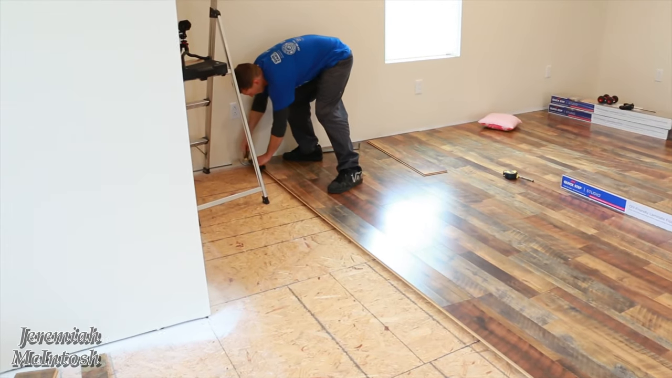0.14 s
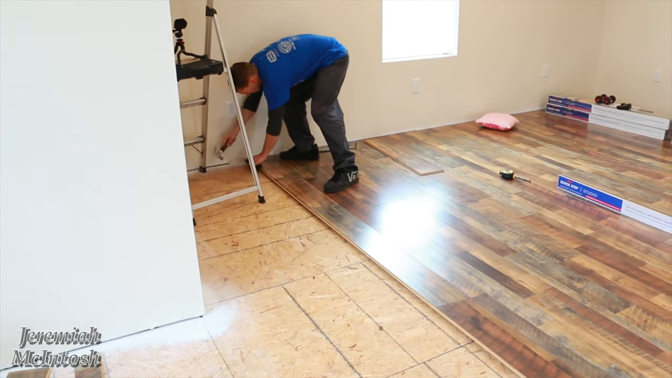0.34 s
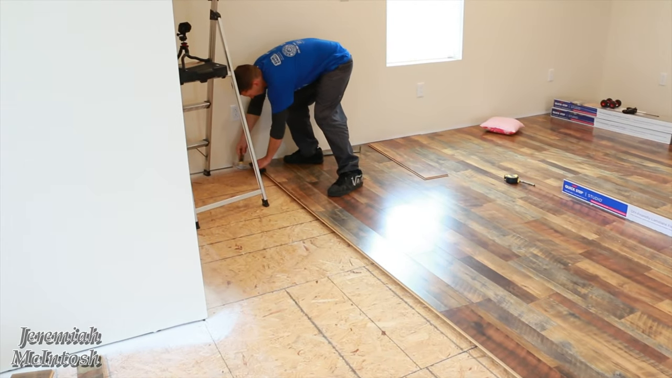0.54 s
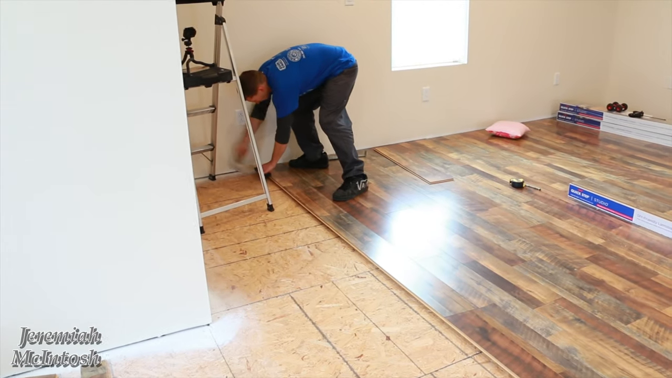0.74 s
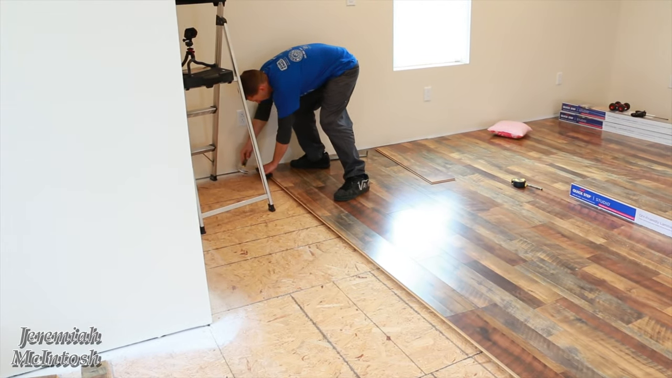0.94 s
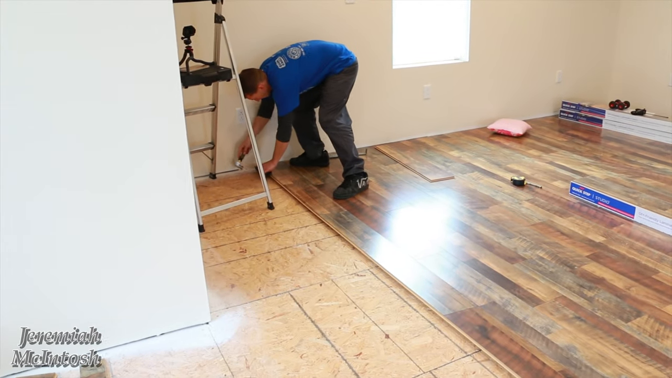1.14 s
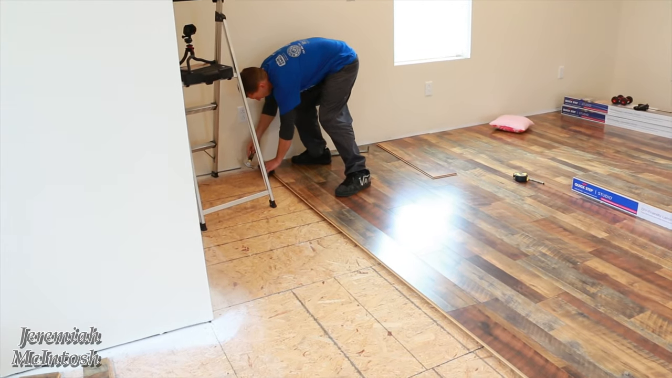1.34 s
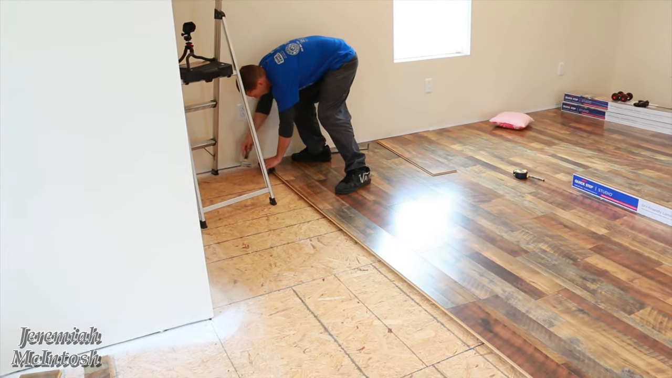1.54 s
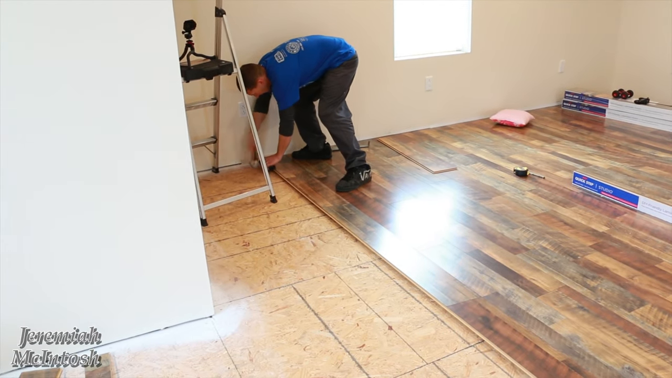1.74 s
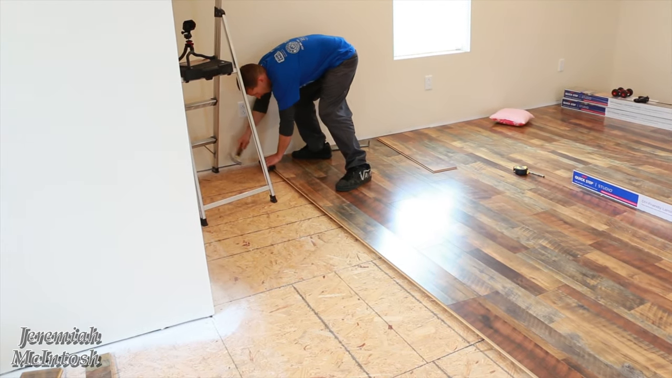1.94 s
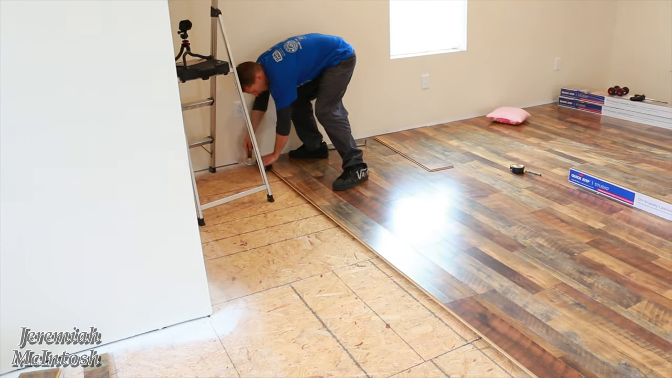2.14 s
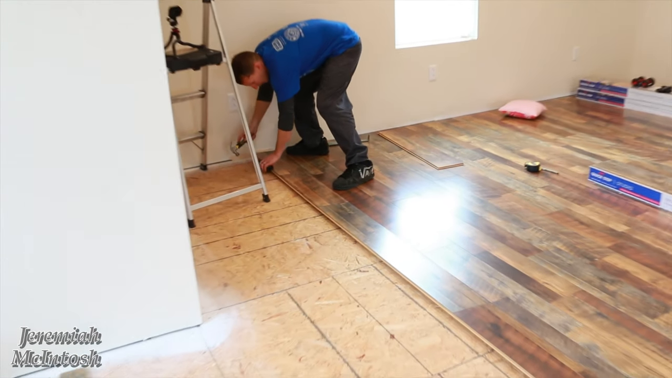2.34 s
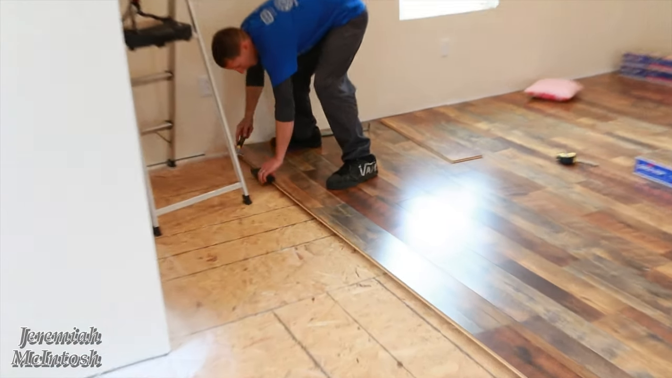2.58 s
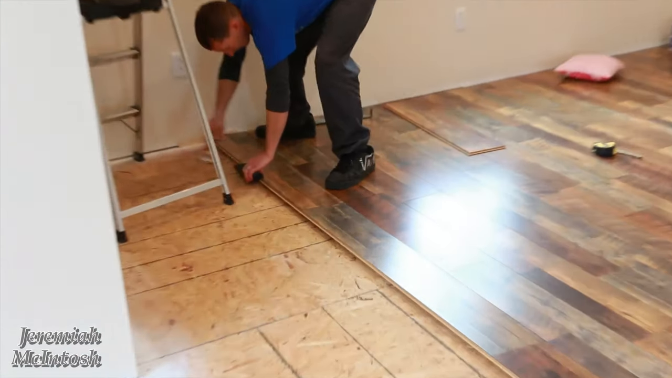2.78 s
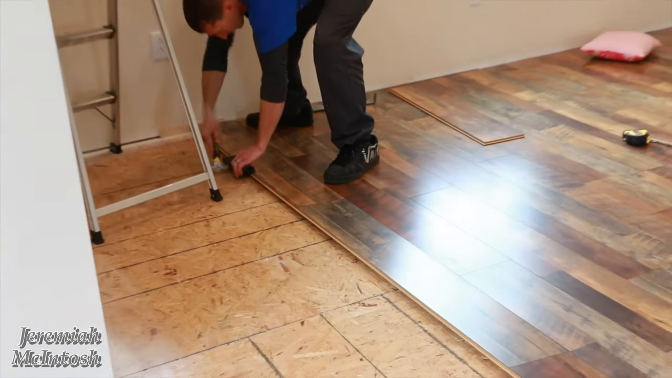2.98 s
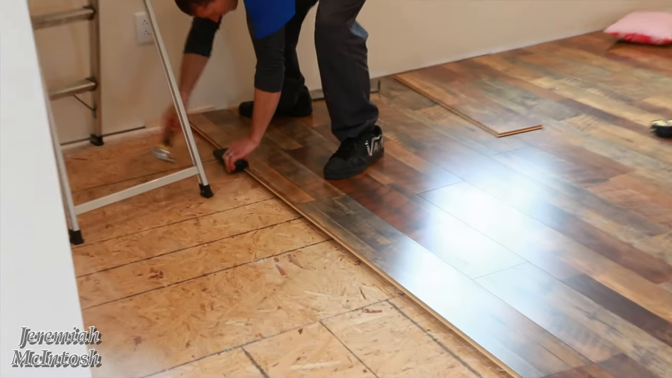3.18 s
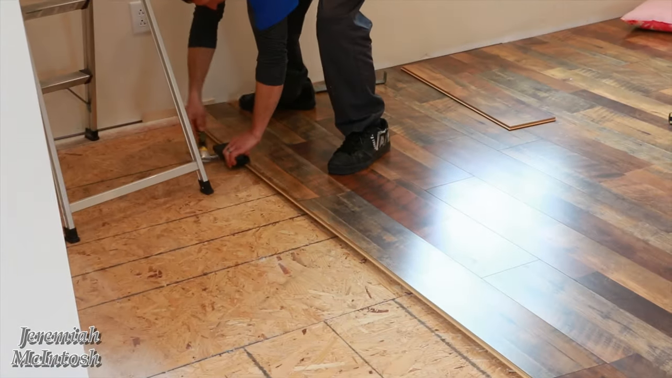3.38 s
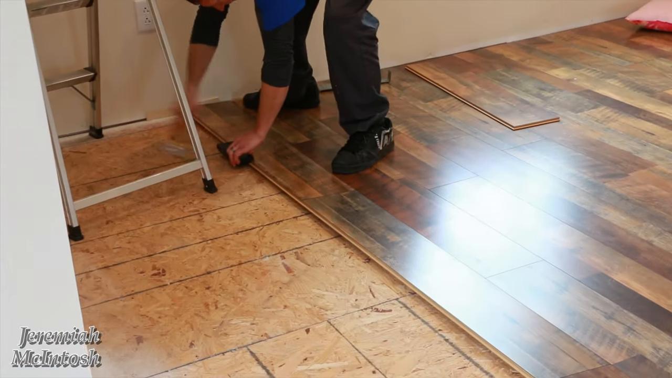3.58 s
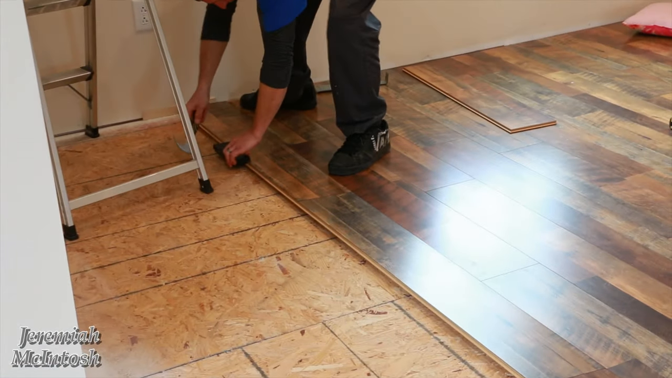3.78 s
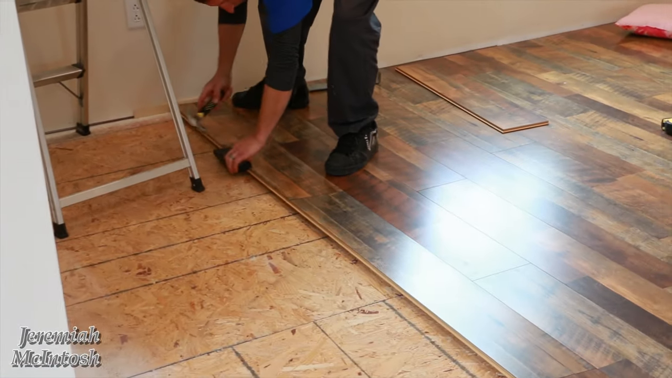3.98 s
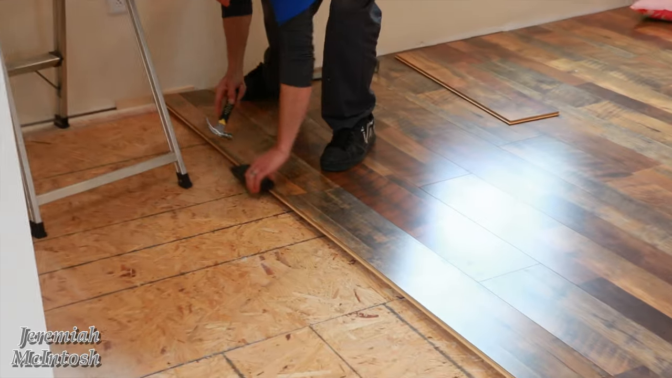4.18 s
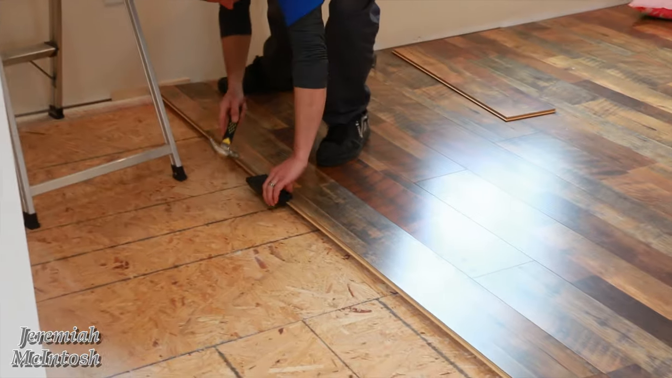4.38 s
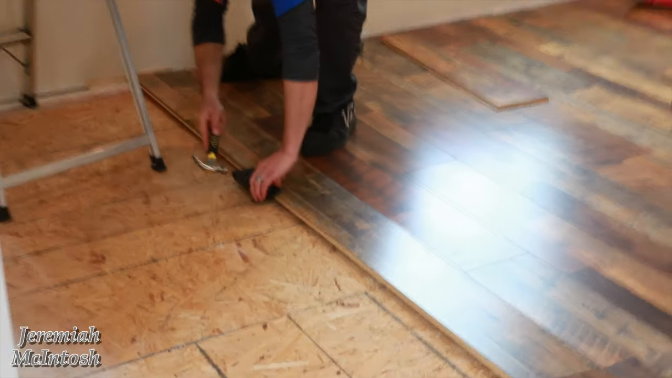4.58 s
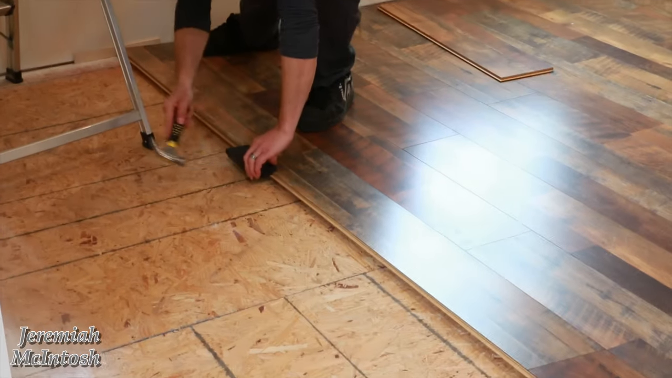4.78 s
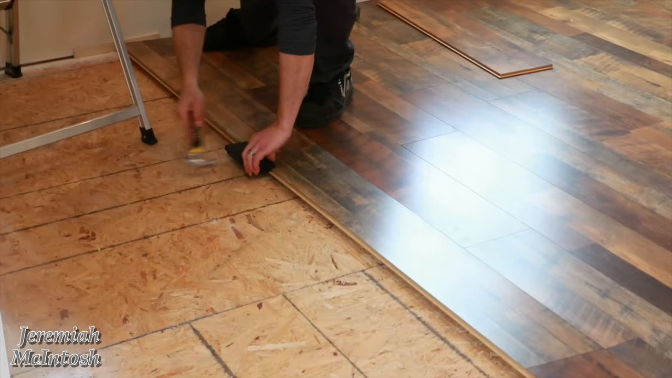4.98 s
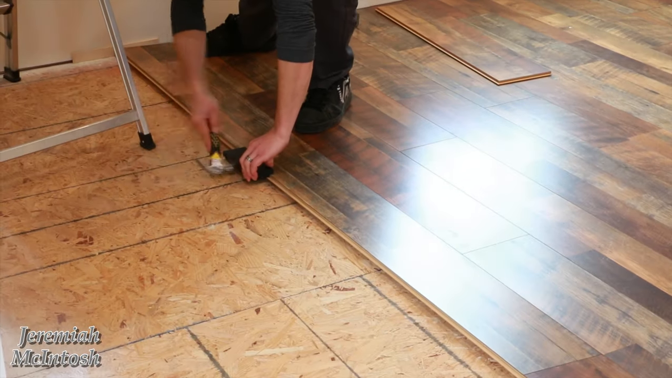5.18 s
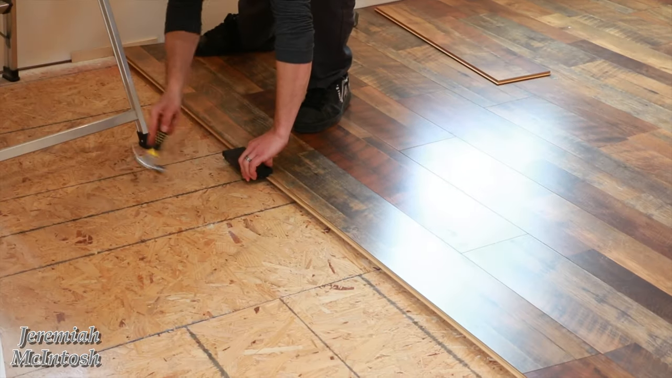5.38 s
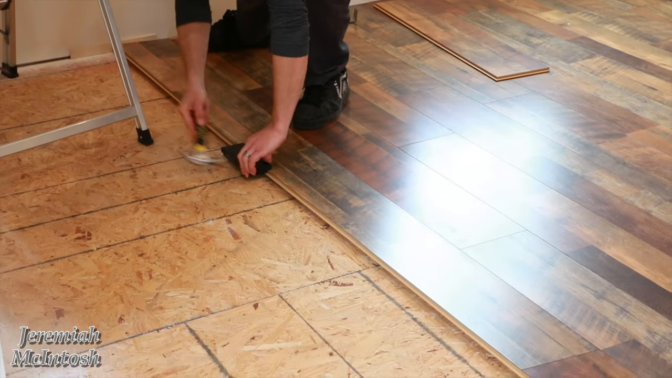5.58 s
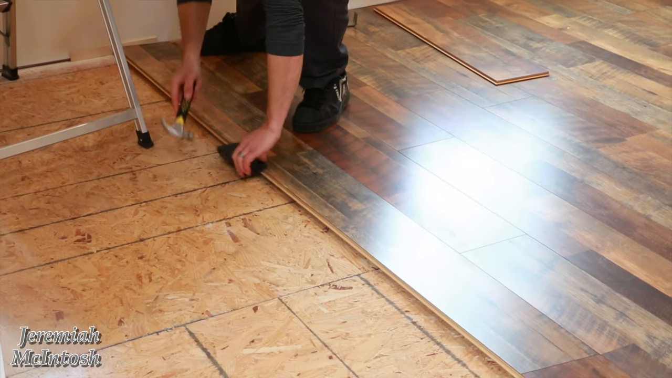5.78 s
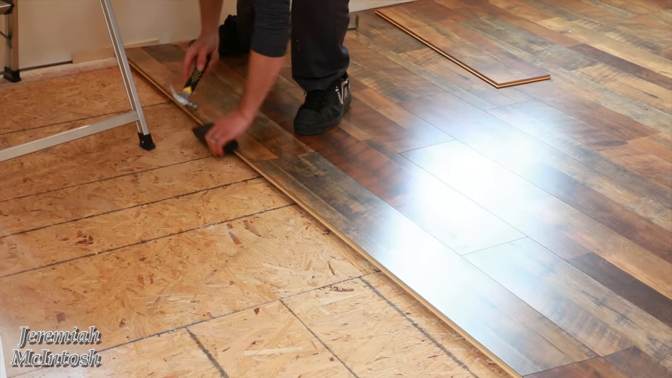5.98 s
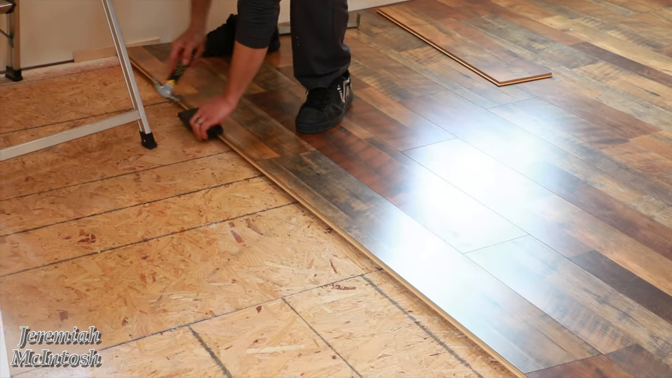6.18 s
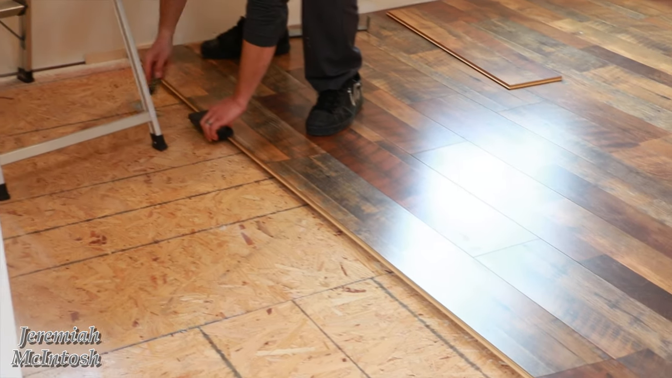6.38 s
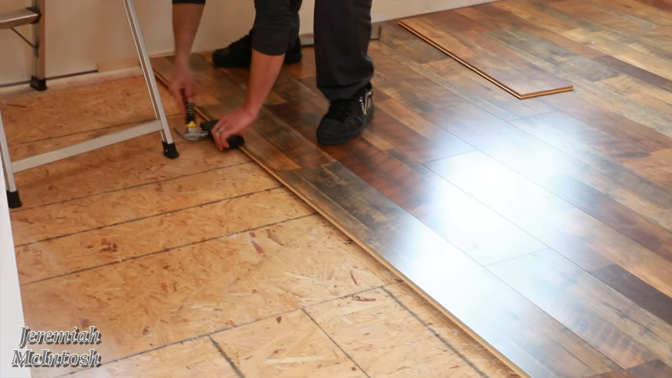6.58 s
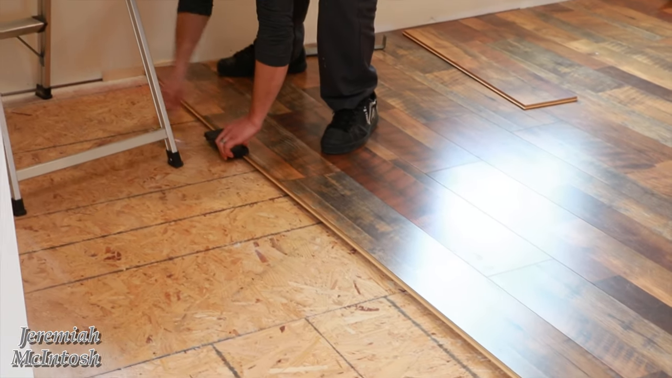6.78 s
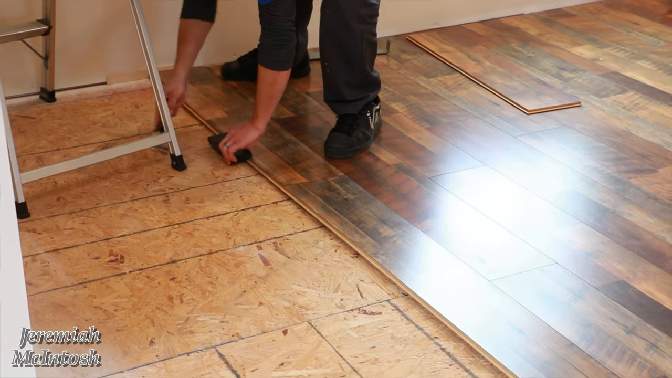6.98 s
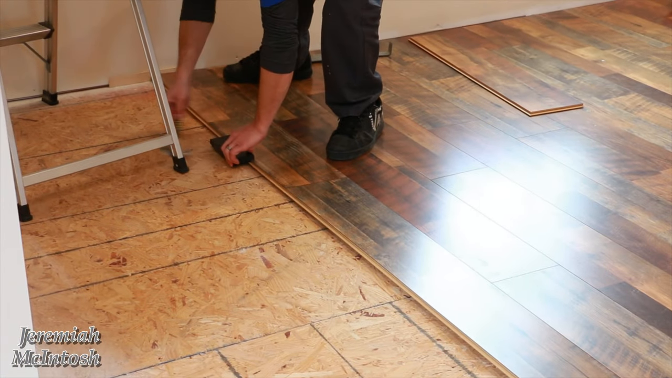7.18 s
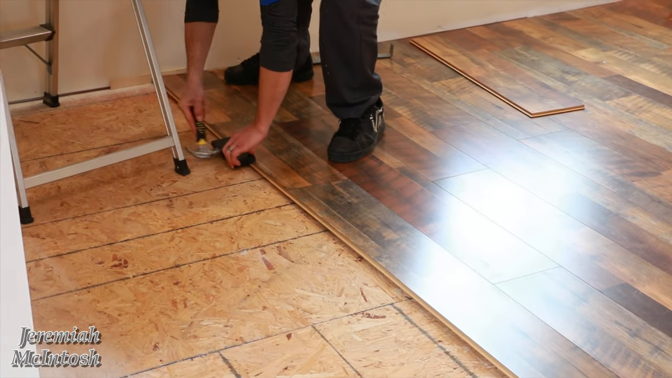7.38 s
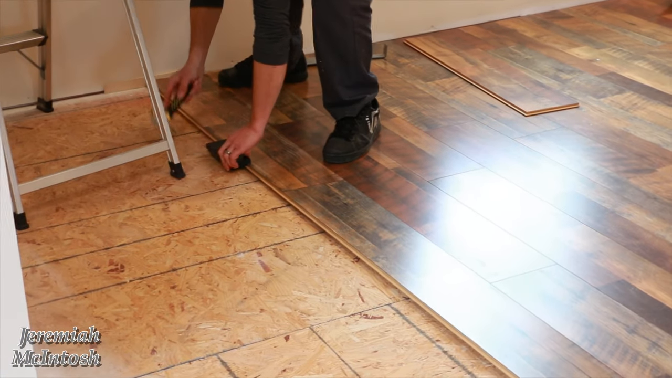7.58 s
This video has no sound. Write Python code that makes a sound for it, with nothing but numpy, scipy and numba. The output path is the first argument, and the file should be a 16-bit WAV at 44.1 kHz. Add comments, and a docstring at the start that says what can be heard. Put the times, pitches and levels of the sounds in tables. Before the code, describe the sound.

A hammer knocks a tapping block against laminate planks in short runs of loud, sharp clacks, ringing hard through a bare, echoing room.

```python
"""A steel hammer drives a tapping block against laminate planks in a bare, very live room, in runs of two to
four blows: noise bursts and a diffuse decay, filtered by the resonances of block, plank and room. The blows
overload the camera; its gain control ducks and recovers about as fast as the room dies away, so the
reverberation hangs level before it fades. Filtered noise gives knee, shoes, cloth and block touches between the
blows, and steady hush and handling rumble beneath."""
import sys
import numpy as np
from scipy import signal
from scipy.fft import rfft, irfft
from scipy.io import wavfile
from scipy.ndimage import map_coordinates
from numba import njit

SR = 44100
rng = np.random.default_rng(int(sys.argv[2]) if len(sys.argv) > 2 else 0)


def output_pcm(signal):
    """Save a mono or channel-first signal as 16-bit PCM at the path in sys.argv[1].

    Samples are clipped to [-1, 1] before scaling.
    """
    pcm = np.clip(np.atleast_2d(signal).T, -1, 1) * 32767
    wavfile.write(sys.argv[1], SR, np.round(pcm).astype(np.int16))


N = 336483  # length in samples

# Spectrum of light friction, of wood or cloth. Each row: frequency in Hz, relative level per Hz in dB.
TOUCH_SPECTRUM = [(200, -20), (2000, -4), (6000, -1), (9000, 0), (12000, -2), (16000, -11)]


def amp(db):
    """Level is logarithmic: 20 dB is a tenfold amplitude."""
    return 10 ** (np.asarray(db) / 20)


def unit(x):
    """Root-mean-square normalisation: equal mean power for any signal."""
    return x / np.sqrt(np.mean(x ** 2) + 1e-20)


def along(points, hz):
    """Interpolation on a logarithmic frequency axis, from rows of frequency in Hz and value."""
    f, v = np.transpose(points)
    return np.interp(np.log(hz + 1), np.log(f + 1), v)


def hump(hz, centre_hz, width_hz):
    """Lorentzian resonance: 1 at its centre, one half at half the width to either side."""
    return 1 / (1 + (2 * (hz - centre_hz) / width_hz) ** 2)


def coloured(x, colour_db, size=8192):
    """Minimum-phase filtering: the folded cepstrum makes a causal filter of unit power from a dB shape."""
    gain = unit(amp(colour_db(np.fft.rfftfreq(size, 1 / SR))))
    cepstrum = irfft(np.log(gain + 1e-6))
    cepstrum[1:size // 2] *= 2
    cepstrum[size // 2 + 1:] = 0
    impulse_response = irfft(np.exp(rfft(cepstrum)))[:size // 2]
    return signal.oaconvolve(x, impulse_response)[:len(x)]


def add(track, s, x):
    """Linear superposition: x joins the track from time s in seconds, cut at both ends."""
    i = round(s * SR)
    x = x[max(-i, 0):N - i]
    track[max(i, 0):][:len(x)] += x


def patches(rows, columns):
    """Correlated random field: interpolation between random knots one unit apart."""
    knots = rng.standard_normal((int(rows[-1]) + 2, int(columns[-1]) + 2))
    grid = np.meshgrid(rows, columns, indexing="ij")
    return unit(map_coordinates(knots, grid, order=1))


def swells(events):
    """Gaussian envelopes of smooth movements; the length spans two standard deviations about the peak."""
    t = np.arange(N) / SR
    return sum(amp(db) * np.exp(-(2 * (t - peak) / length) ** 2 / 2) for peak, length, db in events)


def burst(t, start, t60, rise=.0006):
    """Impact noise: fast exponential onset to about rms 1, then exponential decay."""
    age = np.maximum(t - start, 0)
    shape = (1 - np.exp(-age / rise)) * amp(-60 * age / t60)
    return unit(shape * rng.standard_normal(len(t))) * np.sqrt(np.mean(shape ** 2))


def reverberation(t, clump_db=1.1, clump_hz=900, clump_time=.03):
    """Diffuse field from about rms 1: absorption sets the decay by frequency, reflections come in clumps."""
    # Decay of the empty room. Each row: frequency in Hz, time to fall by 60 dB in seconds.
    decay_times = [(55, .35), (78, .9), (120, .5), (220, 1.1), (450, 1.45), (660, 1.72), (1500, 1.68),
                   (2900, 1.46), (5500, 1.3), (8500, 1.02), (12000, .72), (16000, .42)]
    hz, age, noise = signal.stft(rng.standard_normal(len(t)), SR, nperseg=512)
    clumps = unit(amp(clump_db * patches(hz / clump_hz, age / clump_time)))
    decay = amp(-60 * age / along(decay_times, hz)[:, None])
    return signal.istft(noise * clumps * decay, SR, nperseg=512)[1][:len(t)]


def blow_paths(t, bounce, crack_db=12.4, bounce_db=15.7, crack_t60=.023, wall_db=4, first_wall=.019,
               last_wall=.044, lull_db=-2, far_walls=.07, build=.005):
    """Propagation paths: straight, off the floor after bounce seconds, off near walls, then diffuse."""
    # Distinct echoes off the nearest walls. Each row: mean delay in seconds, mean level in dB.
    echoes = [(.0085, -15), (.0225, -11), (.031, -15), (.043, -12)]
    early = t[:SR // 8]
    straight = amp(crack_db) * burst(early, 0, crack_t60)
    crack = straight + amp(bounce_db) * burst(early, bounce, crack_t60)
    # the straight path keeps the treble and thump that the walls soak up (Hz, dB)
    unabsorbed = [(80, 2), (330, -1.5), (650, 1.5), (1000, 2.5), (2000, 0), (4000, .5), (8000, 6), (15000, 7)]
    # the block's hard clack is strongest on this path: 2.5 dB at 2980 Hz, 300 Hz wide
    crack = coloured(crack, lambda hz: along(unabsorbed, hz) + 2.5 * hump(hz, 2980, 300))
    # dB course of the diffuse sound: near walls, lull, far walls
    walls = np.interp(t, [first_wall - .004, first_wall, last_wall, last_wall + .004, far_walls, far_walls + .004],
                      [0, wall_db, wall_db / 1.5, lull_db, lull_db, 0])
    sound = amp(walls) * (1 - np.exp(-t / build)) * reverberation(t)
    add(sound, 0, crack)
    for delay, db in echoes:
        add(sound, delay + rng.normal(0, .0012), amp(db + rng.normal(0, 1.5)) * crack)
    return sound


def hammer(level_db=-6.1, thud_hz=300, bright_hz=3500, ripple_db=2, spacing_hz=22, ripple_top_hz=900):
    """Modal excitation: each blow rings the same block, while the plank's colour varies with the spot struck."""
    # Hammer blows. Each row: start in seconds, relative force in dB, floor thud in dB,
    # brightness of contact in dB, plank resonance in Hz.
    blows = [ (-1.2, 1.5, 6, -5, 560), (.1557, .3, 2.5, .2, 380), (.4848, 0, -1, .5, 540),
             (.8227, 1.5, -.5, -2.3, 480), (1.793, .3, 1, .3, 560), (2.0917, .6, -1, -1.6, 560),
             (3.0261, .3, -2.5, 1, 720), (3.3579, 0, -3.5, 0, 780), (3.6586, -.7, -2, -1, 700),
             (4.8965, 0, .5, 2.3, 400), (5.2203, -.7, 0, -1.7, 1000), (5.5161, -1.6, -4, -2.5, 1100),
             (6.5699, -.5, -3, 1.8, 1120), (6.8612, -1, 4, -1, 1080), (7.1065, -1, 4, -2, 1120),
             (7.3459, -1, 8, -4, 1080), ]
    # Block and plank when struck. Each row: frequency in Hz, relative level per Hz in dB.
    knock_spectrum = [(30, -36), (100, -29), (200, -15.7), (340, -9.2), (500, -8), (700, -2.8), (1100, -2),
                      (1700, -2.8), (2700, -3.3), (3400, -2.3), (4500, -8.4), (5300, -9.5), (6800, -18.4),
                      (9000, -24), (11000, -34), (16000, -42)]
    # Modes of block, planks and hammer head, and at 660 Hz a mode of the room. Each row: frequency in Hz, width
    # in Hz, lift in dB.
    modes = [(205, 30, 3), (660, 36, 4.5), (1130, 70, 3), (2240, 250, 2.8), (3040, 90, 3.5),
             (3700, 300, 1.5), (7190, 55, 5.5), (11950, 400, 3.5)]
    plank_db, plank_width = 3.5, .4  # lift, and width as a share of the resonance frequency
    bounce_s, bounce_scatter = .0024, .15  # floor bounce: delay, and its relative change from blow to blow
    track, t = np.zeros(N), np.arange(2 * SR) / SR
    for s, force_db, thud_db, bright_db, plank_hz in blows:
        bounce = bounce_s * np.exp(bounce_scatter * rng.standard_normal())
        strengths = rng.standard_normal(size=256)  # the floor's many low modes, struck anew

        def colour(hz):
            """Transfer function of this blow in dB: resonances add to the contact spectrum."""
            block = along(knock_spectrum, hz) + sum(db * hump(hz, f, w) for f, w, db in modes)
            plank = plank_db * hump(hz, plank_hz, plank_width * plank_hz)
            subfloor = thud_db / (1 + (hz / thud_hz) ** 4)
            contact = bright_db * hz ** 2 / (hz ** 2 + bright_hz ** 2)
            ripple = ripple_db * np.interp(hz / spacing_hz, np.arange(len(strengths)), strengths)
            # higher up the floor's modes overlap and even out
            ripple = ripple / (1 + (hz / ripple_top_hz) ** 2)
            return block + plank + subfloor + contact + ripple

        blow = coloured(blow_paths(t, bounce), colour)
        add(track, s, amp(level_db + force_db) * blow)
    return track


def background(hush_db=-60, still_hand_db=-60.5):
    """Stationary noise: quiet room tone and hiss, and rumble of the hand that holds the camera."""
    # Room tone and hiss. Each row: frequency in Hz, relative level per Hz in dB.
    hush_spectrum = [(30, -2), (200, -2), (650, -2), (2000, -13), (5000, -20), (9000, -20), (15000, -26)]
    # Handling rumble. Each row: frequency in Hz, relative level per Hz in dB.
    rumble_spectrum = [(15, 0), (35, -5), (70, -16), (150, -28), (400, -49), (2000, -90)]
    # Extra rumble while the camera is moved. Each row: peak time in seconds, length in seconds, level in dB.
    camera_moves = [(.1, .15, -51), (2.75, .5, -58), (4.76, .35, -50)]
    hush = coloured(rng.standard_normal(N), lambda hz: along(hush_spectrum, hz))
    rumble = coloured(rng.standard_normal(N), lambda hz: along(rumble_spectrum, hz))
    return amp(hush_db) * hush + (amp(still_hand_db) + swells(camera_moves)) * rumble


def clothes():
    """Friction noise: cloth brushes on cloth in soft swells as the worker shifts."""
    # Rustles. Each row: peak time in seconds, length in seconds, level in dB.
    rustles = [(.05, .3, -62), (1.35, .25, -62), (2.55, .35, -61), (4.28, .3, -60), (6.07, .22, -58)]
    rustle = coloured(rng.standard_normal(N), lambda hz: along(TOUCH_SPECTRUM, hz))
    return swells(rustles) * rustle


def contacts(events, spectrum, t60, room_db):
    """Soft impacts: a short filtered noise burst, each with the room's diffuse answer."""
    track, t = np.zeros(N), np.arange(SR) / SR
    for s, db in events:
        sound = burst(t, 0, t60) + amp(room_db) * reverberation(t)
        add(track, s, amp(db) * coloured(sound, lambda hz: along(spectrum, hz)))
    return track


def scene():
    """Superposition of hammer, small movements and the quiet room."""
    # Light touches of the block on the plank edge. Each row: start in seconds, level in dB.
    edge_touches = [(.128, -60), (4.321, -65), (4.822, -64), (5.972, -56)]
    # Knee and shoes on the boards. Each row: start in seconds, level in dB.
    knee_bumps = [(4.325, -37), (4.5, -45)]
    # Boards under knee and shoes. Each row: frequency in Hz, relative level per Hz in dB.
    bump_spectrum = [(40, -26), (120, -17), (230, -4), (340, 0), (480, -12), (1500, -30), (8000, -55)]
    touches = contacts(edge_touches, TOUCH_SPECTRUM, t60=.04, room_db=-10)
    bumps = contacts(knee_bumps, bump_spectrum, t60=.15, room_db=-10)
    return (hammer() + background() + clothes() + touches + bumps)[None]


@njit
def ducking(excess, grab, recover, hold):
    """Gain reduction in dB by a peak follower: fast exponential attack, brief hold, steady release."""
    cut, now, wait = np.zeros(len(excess)), 0.0, 0.0
    for i in range(len(excess)):
        if excess[i] > now:
            now += grab * (excess[i] - now)
            wait = hold
        elif wait > 0:
            wait -= 1
        else:
            now = max(now - recover, 0.0)
        cut[i] = now
    return cut


def record(dry, threshold_db=-13.6, attack=.005, hold=.013, release_db_per_s=41.5, low_cut_hz=60, top_hz=16000):
    """Dynamic compression and clipping: the gain control comes too late for the first milliseconds."""
    x = dry[0]
    power = signal.lfilter(*signal.butter(1, 120, fs=SR), x ** 2)  # smoothed below 120 Hz
    excess = 10 * np.log10(np.abs(power) + 1e-12) - threshold_db
    cut_db = ducking(excess, 1 / (attack * SR), release_db_per_s / SR, hold * SR)
    clipped = np.clip(x * amp(-cut_db), -1, 1)
    lean = signal.lfilter(*signal.butter(1, low_cut_hz, "highpass", fs=SR), clipped)
    band_limit = 1 / (1 + (np.fft.rfftfreq(N, 1 / SR) / top_hz) ** 80)  # nearly a brick wall
    return irfft(rfft(lean) * band_limit, N)[None]


dry = scene()
out = record(dry)
output_pcm(out)
```